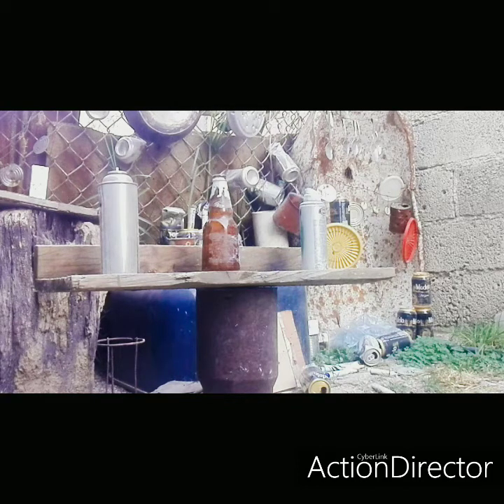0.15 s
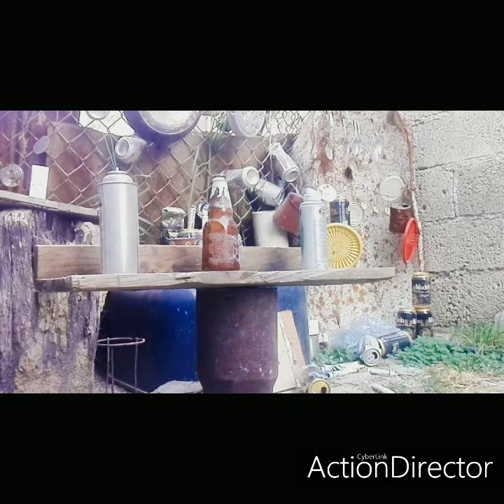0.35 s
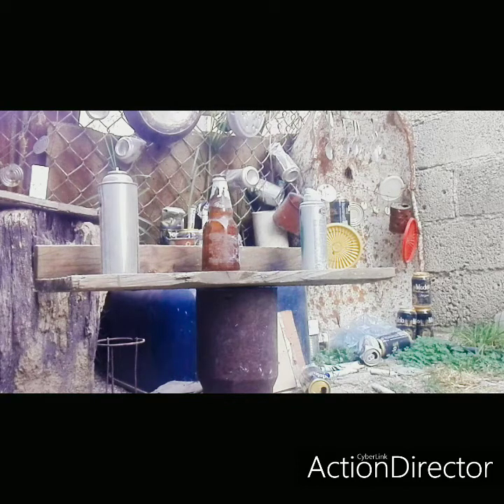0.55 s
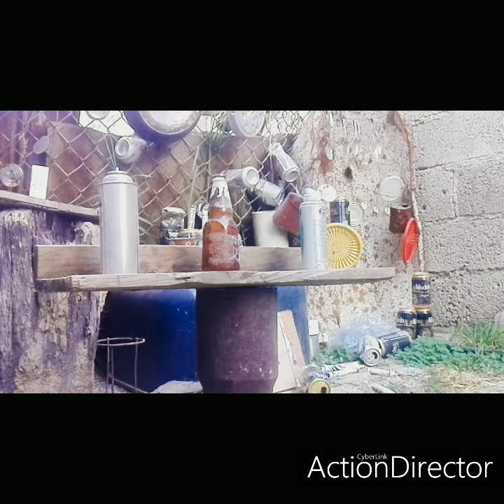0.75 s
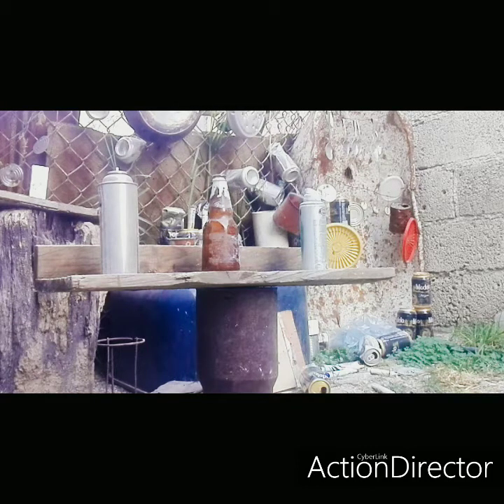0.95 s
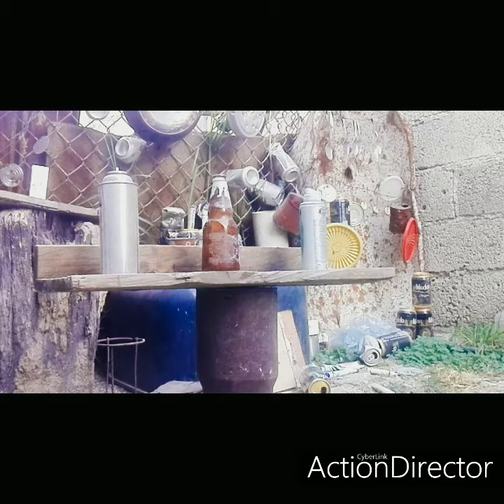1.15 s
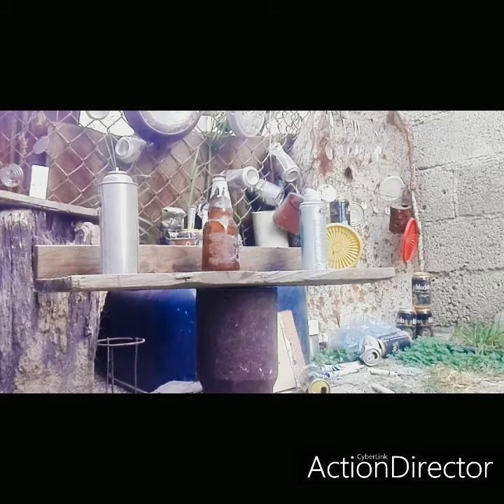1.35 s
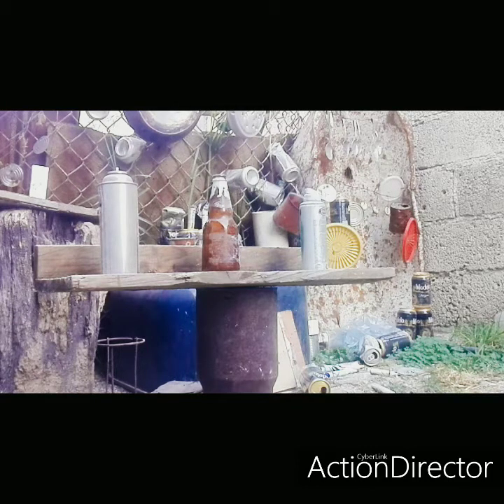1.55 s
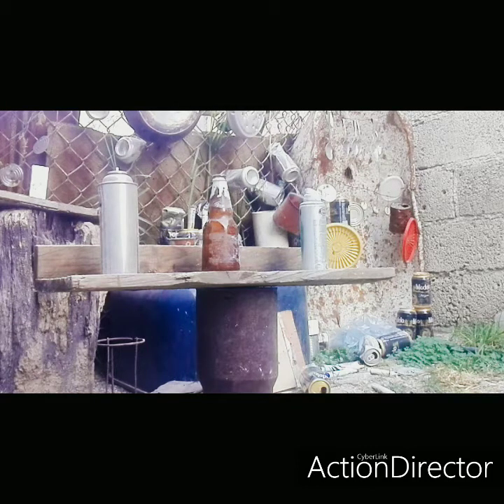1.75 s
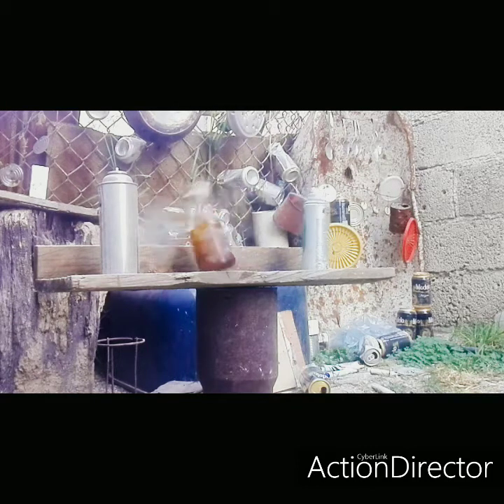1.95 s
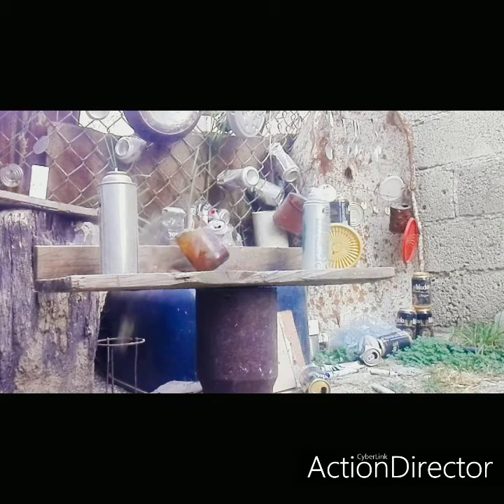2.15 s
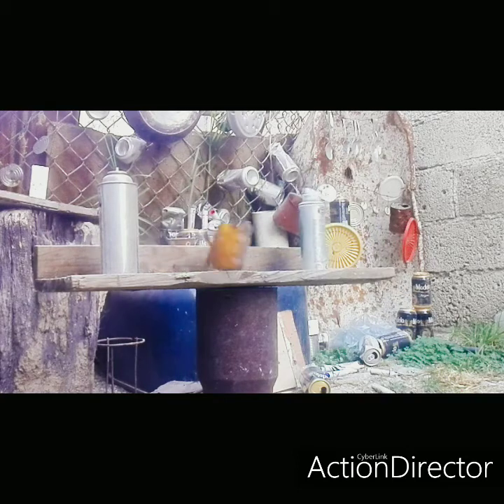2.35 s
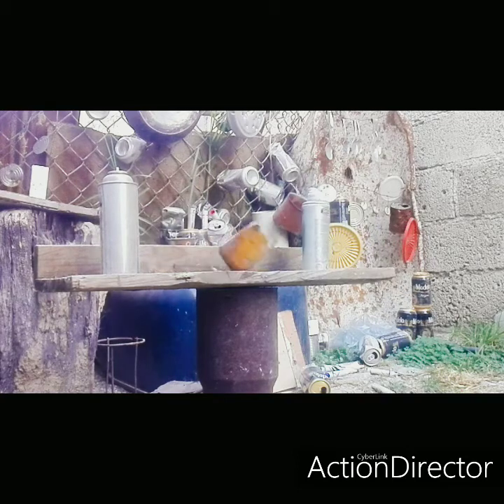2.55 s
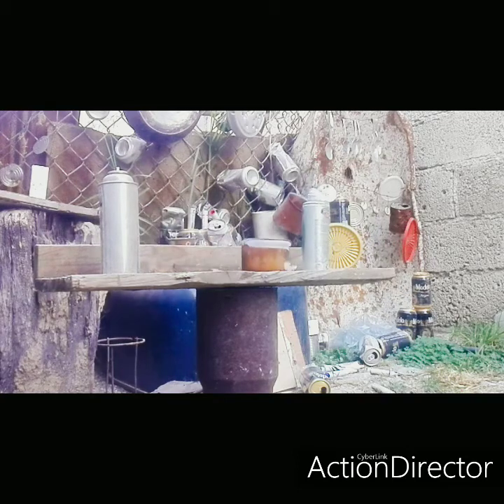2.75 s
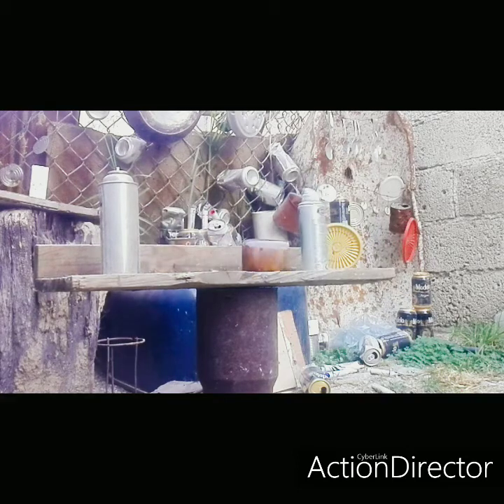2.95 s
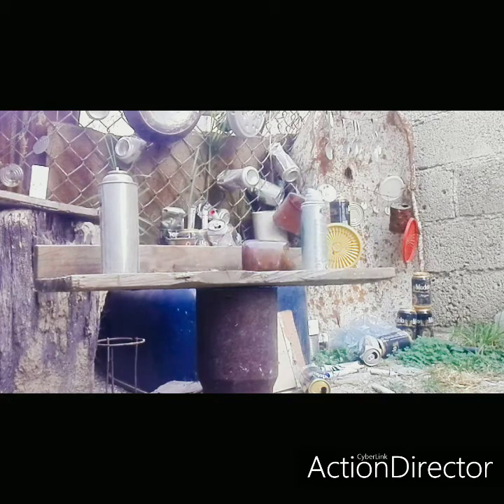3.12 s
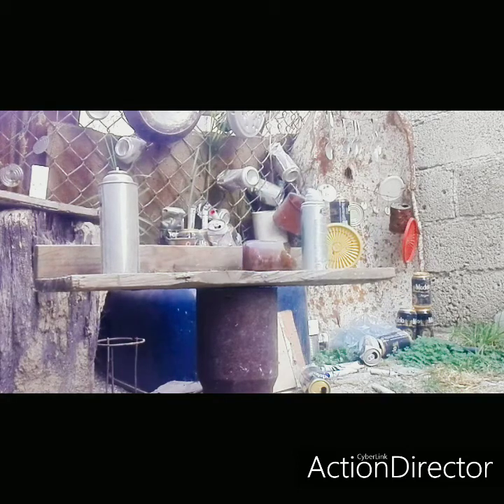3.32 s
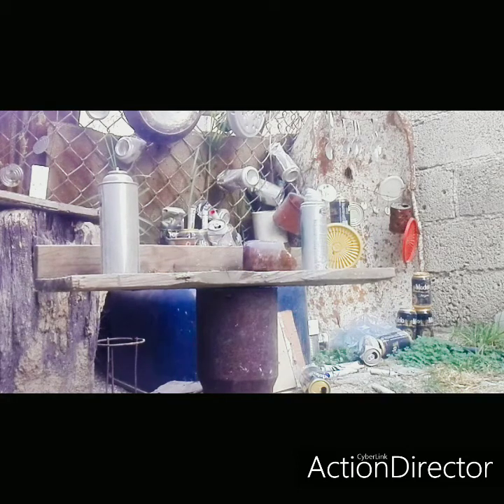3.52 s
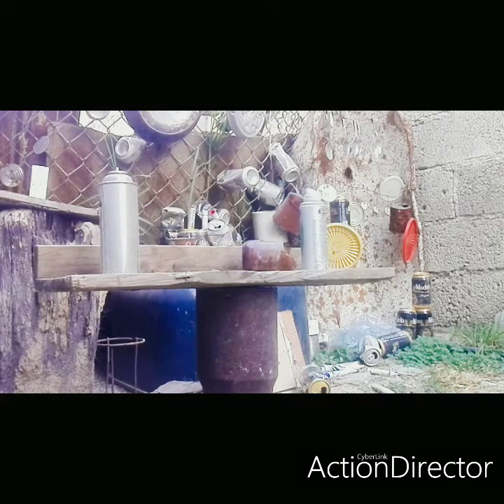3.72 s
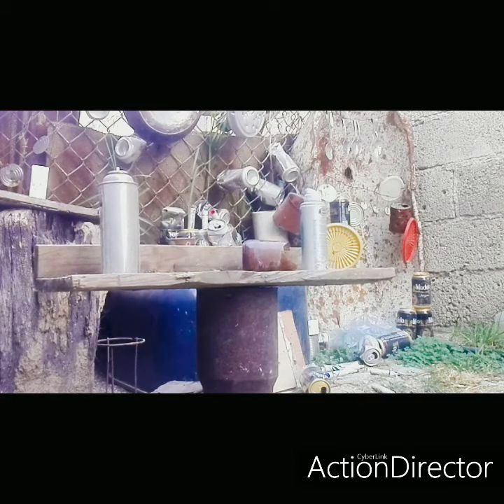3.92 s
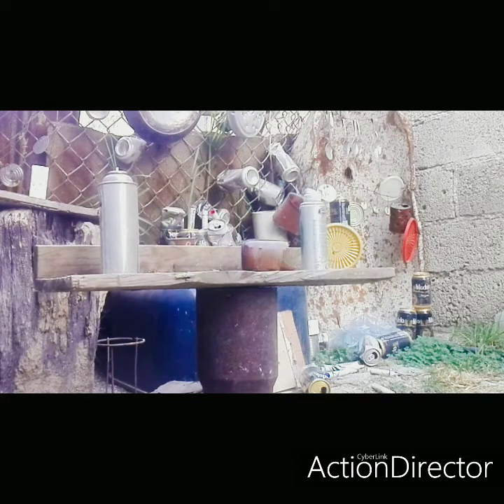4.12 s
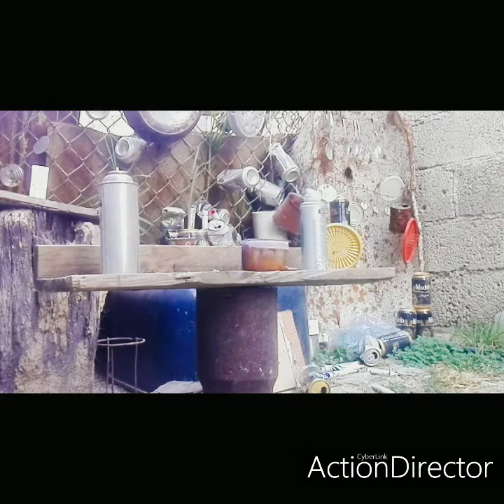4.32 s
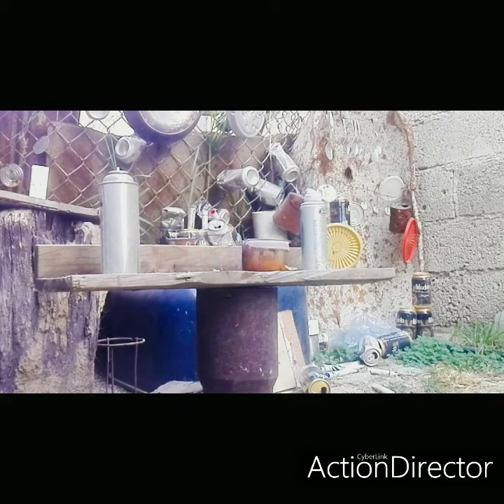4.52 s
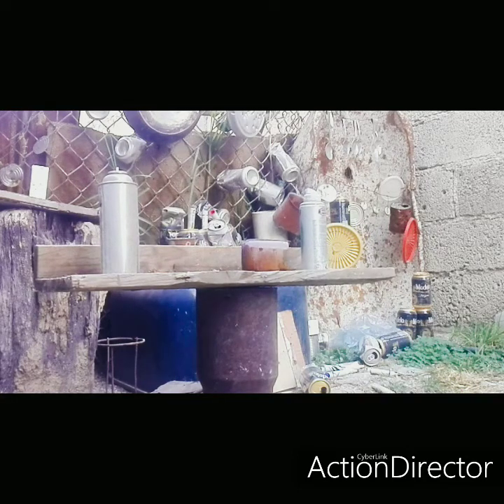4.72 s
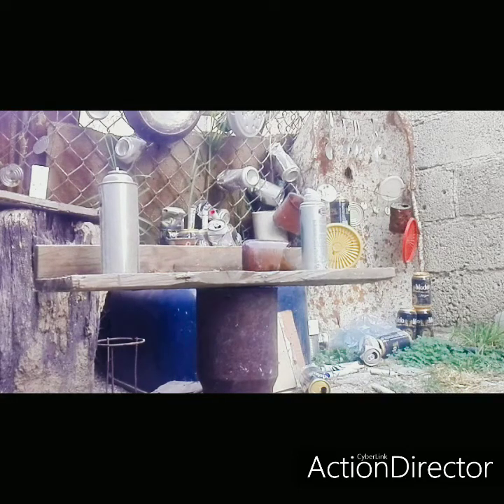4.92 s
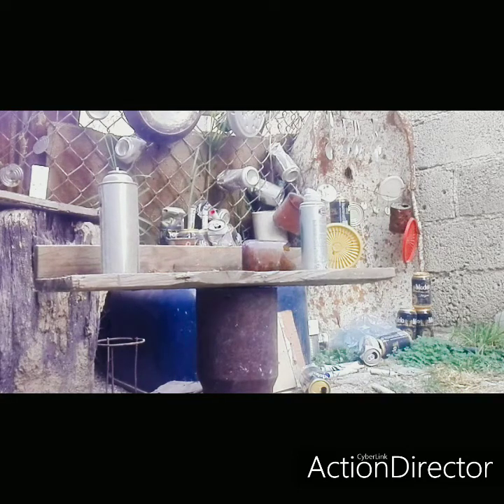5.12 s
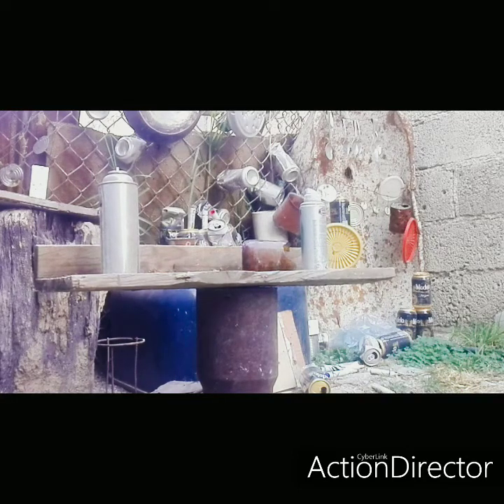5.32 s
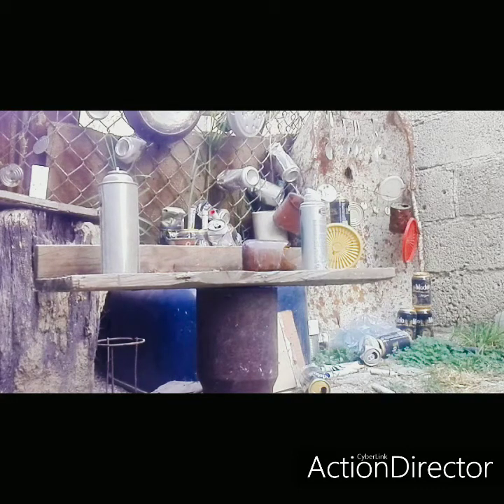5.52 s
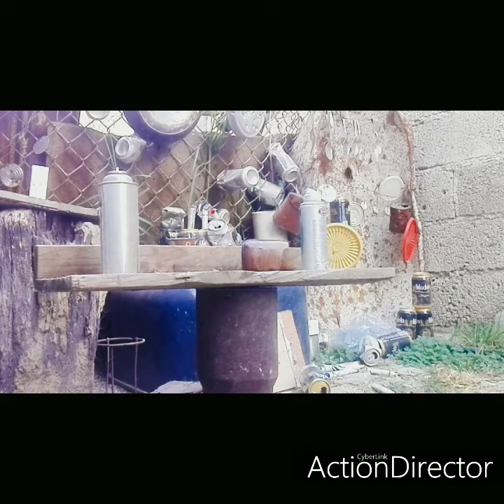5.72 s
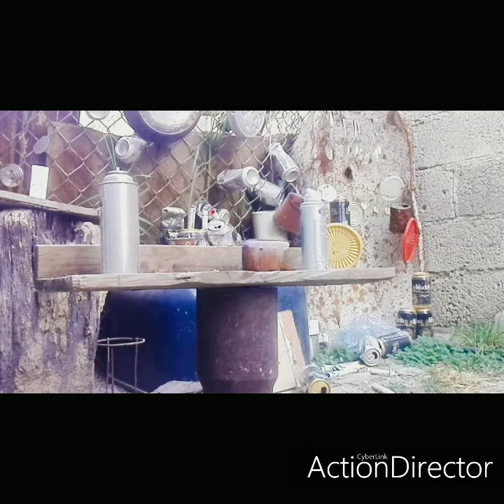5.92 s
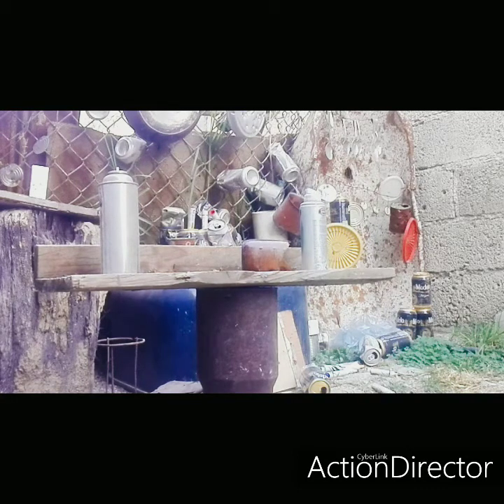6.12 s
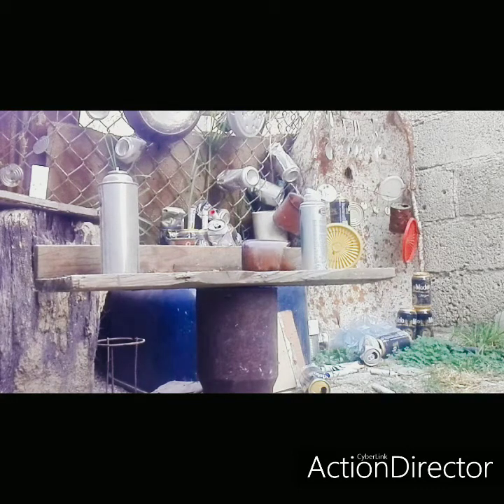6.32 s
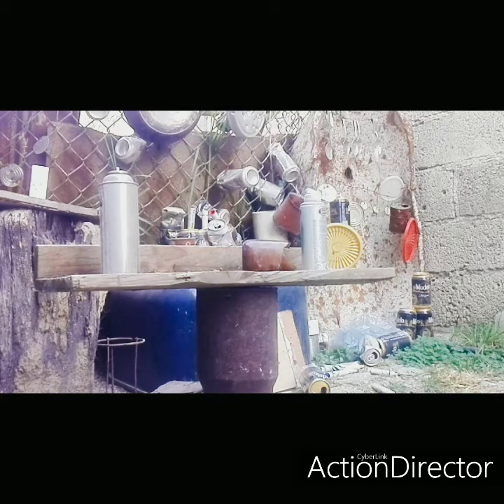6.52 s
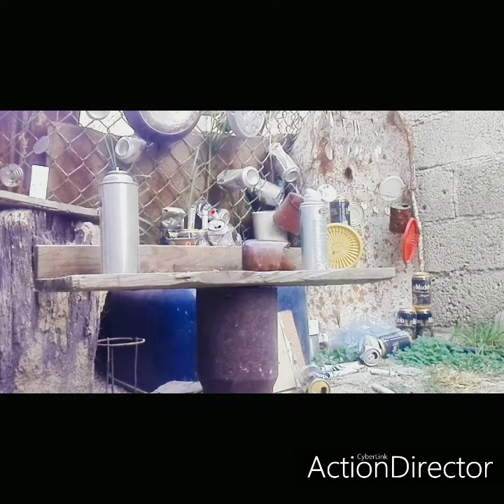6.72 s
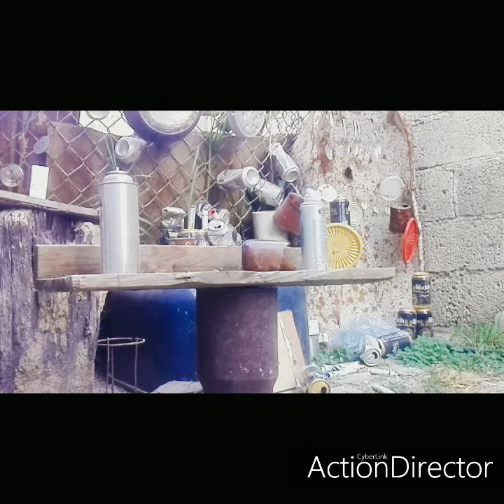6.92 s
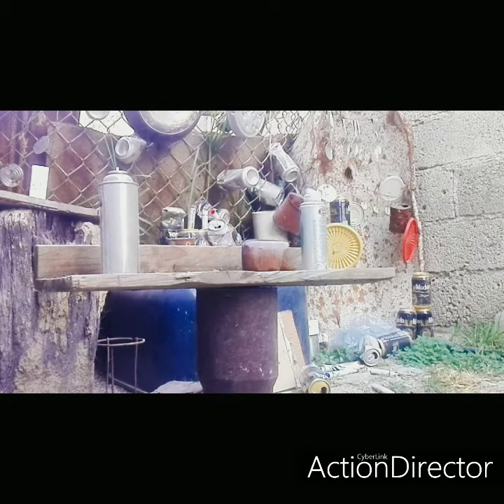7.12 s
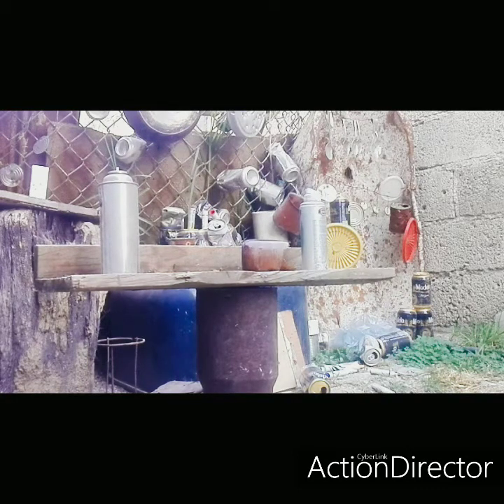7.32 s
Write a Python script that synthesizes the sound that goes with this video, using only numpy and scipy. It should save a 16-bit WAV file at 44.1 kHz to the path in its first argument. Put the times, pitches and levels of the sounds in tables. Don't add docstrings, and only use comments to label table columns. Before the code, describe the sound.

Quiet yard with low machinery drone; a sudden distorted glass smash at two seconds, tinkling splinters, a rocking stump, later a dull distant slam.

```python
import sys
import numpy as np
from scipy import signal
from scipy.fft import rfft, irfft
from scipy.io import wavfile
from scipy.ndimage import uniform_filter1d

SR = 44100
rng = np.random.default_rng(int(sys.argv[2]) if len(sys.argv) > 2 else 0)


def master_out(mix):
    frames = np.transpose(np.atleast_2d(mix))
    ceiling = np.clip(frames, -1, 1)
    pcm = np.round(ceiling * 32767).astype(np.int16)
    wavfile.write(sys.argv[1], SR, pcm)


def attenuation_scalar(level_db):
    decades = np.asarray(level_db, float) / 20
    return 10 ** decades


N = 324646
T = np.arange(N) / SR


def evened(x):
    return x / np.sqrt(np.mean(x ** 2) + 1e-20)


def coloured(x, points, lo_hz=20, hi_hz=20000):
    hz = np.fft.rfftfreq(N, 1 / SR) + 1
    f, db = np.transpose(points)
    gain = attenuation_scalar(np.interp(np.log(hz), np.log(f), db))
    edges = 1 / np.sqrt((1 + (lo_hz / hz) ** 4) * (1 + (hz / hi_hz) ** 4))
    return evened(irfft(rfft(x) * gain * edges, N))


def resonate(x, hz, width):
    turn = np.exp(2j * np.pi * np.cumsum(hz * np.ones(N)) / SR)
    r = np.exp(-np.pi * width / SR)
    return 2 * (turn * signal.lfilter([1 - r], [1, -r], x / turn)).real


def strike(s, db, t60, rise):
    t = np.maximum(T - s, 0)
    fall = attenuation_scalar(db - 60 * np.minimum(t / t60, 3))
    return fall * (1 - np.exp(-t / rise)) * (t < 3 * t60)


def hump(start, length, db, peak=.6, pointed=2):
    u = np.clip((T - start) / length, 0, 1)
    bend = np.log(.5) / np.log(np.clip(peak, .1, .9))
    return attenuation_scalar(db) * np.sin(np.pi * u ** bend).clip(0) ** pointed


def humps(rows, bed_db, peak=.6):
    return np.sqrt(attenuation_scalar(bed_db) ** 2 + sum(hump(*row, peak) ** 2 for row in rows))


def hiss():
    # (frequency [Hz], level [dB per Hz])
    air_colour = [(15, -63), (25, -35.5), (47, -30), (77, 0), (98, -0.5), (115, -8.5), (131, -19.5),
                  (223, -28), (525, -56), (1270, -48.5), (2340, -52), (13700, -55.5), (14800, -65.5)]
    # (time [s], level [dB])
    hiss_level = [(0, -76), (2.04, -80), (3.05, -82.5), (7.36, -82)]
    s, db = np.transpose(hiss_level)
    return attenuation_scalar(np.interp(T, s, db)) * coloured(rng.standard_normal(N), air_colour, lo_hz=597)


def wind():
    # (start [s], length [s], level [dB])
    gusts = [
        (.35, 0.7, -55),
        (1.6, .5, -58.5),
        (3.3, 0.92, -68),
        (4.95, .6, -64.5),
        (5.7, 0.25, -58),
        (6.3, 0.42, -56),
        (7.0, 0.19, -66.5),
    ]
    colour = [(8, -20), (20, -0.5), (50, -2.5), (120, -14), (300, -30.5), (900, -68)]  # (Hz, dB per Hz)
    return humps(gusts, -74.5, peak=0.55) * coloured(rng.standard_normal(N), colour)


def traffic():
    # (start [s], length [s], roar level [dB], swish relative to the roar [dB])
    passes = [(-.3, 1.06, -67.5, -11.5), (1.05, .34, -73, -17), (1.85, 0.47, -53.5, -20.5),
              (3.2, 1.2, -75.5, -9), (4.85, 1.07, -63.5, -10.5), (5.557, 0.266, -66.5, -26),
              (6.3, 0.55, -57.5, -8.5), (6.8, 0.38, -74, -9)]
    # (frequency [Hz], level [dB per Hz])
    roar_colour = [(110, -34.5), (190, -4.5), (216, 2.5), (254, -6), (355, -10), (800, -26), (1040, -57.5),
                   (1760, -120)]
    # (frequency [Hz], level [dB per Hz])
    swish_colour = [(410, -31.5), (700, -2), (749, -3.5), (1130, -1), (1230, -2), (1900, -5), (2130, -11),
                    (3500, -22), (4550, -48.5), (7700, -120)]
    roar = humps([row[:3] for row in passes], -80, peak=0.52)
    swish_rows = [(s, length, db + swish_db) for s, length, db, swish_db in passes]
    swish = humps(swish_rows, -87.5, peak=0.53)
    low = roar * coloured(rng.standard_normal(N), roar_colour)
    return low + swish * coloured(rng.standard_normal(N), swish_colour)


def groan():
    # (start [s], length [s], level [dB], pitch [Hz])
    metal = (.12, .23, -48, 237)
    turns = 2 * np.pi * metal[3] * T
    notes = np.sin(turns) + attenuation_scalar(-16) * np.sin(1.48 * turns) + attenuation_scalar(-25.5) * np.sin(2 * turns)
    return hump(*metal[:3], peak=0.68) * notes


def drone():
    # (start [s], length [s], level [dB], pitch [Hz])
    swells = [(-.1, .2, -47.5, 98), (.2, 0.59, -47, 99), (.55, .36, -53.5, 74.5), (.94, .1, -55, 97),
              (1.08, 0.38, -48, 86.5), (1.45, .42, -58, 74), (1.88, .2, -43, 98), (2.5, .17, -51, 100),
              (2.93, .14, -58, 77), (3.15, .12, -60, 92), (3.43, 0.31, -50, 87), (3.7, .42, -47.5, 76.5),
              (4.12, .12, -53.5, 95), (4.42, .2, -51, 96.5), (4.82, 0.36, -48.5, 98), (5.15, .1, -54, 106),
              (5.26, .12, -51, 94), (5.41, .13, -46.5, 97.5), (5.57, .17, -47.5, 97.5),
              (5.79, 0.523, -46.5, 85), (6.38, .25, -45.5, 92), (7.15, 0.14, -61, 88)]
    # (start [s], length [s], level [dB])
    rumbles = [(-.3, 0.58, -57.5), (.4, 0.42, -59), (1.0, 0.92, -65), (1.84, .25, -46), (3.1, 0.28, -61.5),
               (5.0, .8, -63.5)]
    idle_hz, idle_db = 87, -63
    rows = swells + [(-10.5, 25, idle_db, idle_hz)]
    power = np.array([hump(s, length, db, .57, pointed=1.2) ** 2 for s, length, db, _ in rows])
    pitches = np.array(rows)[:, 3]
    hz = pitches @ power ** 2 / (power ** 2).sum(0)
    level = np.sqrt(power.sum(0))

    fuzz = evened(resonate(resonate(rng.standard_normal(N), hz, 12), hz, 31))
    steady = .65 * (1 - power[-1] / level ** 2)
    tone = np.sqrt(2) * np.sin(2 * np.pi * np.cumsum(hz) / SR)
    hum = steady * tone + np.sqrt(1 - steady ** 2) * fuzz

    rumble = evened(resonate(resonate(rng.standard_normal(N), 165, 22), 150, 21))
    rumble_level = np.hypot(humps(rumbles, -71.5), attenuation_scalar(-22) * level)
    return level * hum + rumble_level * rumble


def door():
    # (time [s], level [dB], time to fall 60 dB [s], sharpness [dB])
    slams = [
        (1.892, -50, .6, -16),
        (6.352, -35, 0.21, 5),
        (6.39, -43.5, 0.57, 0),
        (6.46, -44, 0.25, 8),
        (6.559, -49, 0.086, 13),
        (6.614, -53, .2, 11),
    ]
    # (frequency [Hz], level [dB per Hz])
    door_colour = [(35, -33), (86, 1), (124, -7), (168, -2.5), (407, -24), (1000, -24), (2800, -39),
                   (4600, -72)]
    body = np.sqrt(sum(strike(s, db, t60, 0.002) ** 2 for s, db, t60, _ in slams))
    edge = np.sqrt(sum(strike(s, db + sharp_db - 20, .8 * t60, 0.0014) ** 2
                       for s, db, t60, sharp_db in slams))
    noise = rng.standard_normal(N)
    return body * coloured(noise, door_colour, hi_hz=500) + edge * coloured(noise, door_colour, lo_hz=700)


def plank():
    # (time [s], level [dB], time to fall 60 dB [s])
    rocks = [
        (2.833, -44, .3),
        (2.878, -41, .3),
        (2.945, -53, .3),
        (3.02, -65, .3),
        (3.06, -65, .3),
        (3.18, -77, .8),
    ]
    # (frequency [Hz], level [dB per Hz])
    wood_colour = [(250, -25), (400, -3), (900, 0), (1200, -6), (1800, -22), (3000, -45)]
    grains = rng.standard_normal(N) * (rng.random(N) < .03)
    level = np.sqrt(sum(strike(s, db, t60, .002) ** 2 for s, db, t60 in rocks))
    return level * coloured(grains, wood_colour)


def pure_notes(rows):
    return sum(strike(s, db, t60, 0.0021) * np.sin(2 * np.pi * hz * (T - s)) for s, db, hz, t60 in rows)


def flakes():
    # (time [s], level [dB], pitch [Hz], time to fall 60 dB [s])
    flake_notes = [
        (2.193, -30, 6200, 0.06),
        (2.27, -46.5, 12400, 0.11),
        (2.535, -42, 9700, 0.039),
        (6.614, -45, 1300, 0.043),
        (6.65, -56.5, 990, .05),
    ]
    return pure_notes(flake_notes)


def thumps():
    # (time [s], level [dB], pitch [Hz], time to fall 60 dB [s])
    blows = [
        (2.042, -1, 142, 0.062),
        (2.044, -6, 48, 0.07),
        (2.045, -8, 72, 0.091),
        (2.044, -7, 580, 0.079),
        (2.046, -16, 310, .07),
        (2.404, -36, 389, 0.048),
        (2.556, -42, 149, 0.13),
        (6.355, -20.5, 158.5, 0.075),
        (6.354, -29.5, 236, .07),
        (6.353, -45, 39.6, 0.093),
    ]
    return pure_notes(blows)


def ring(modes, rattle, split=0.015, flutter=.3):
    t = T[:SR // 2]
    contacts = rng.standard_normal(4000) * np.exp(-t[:4000] / rattle) * (rng.random(4000) < .03)
    contacts[0] = 1
    out = 0
    for hz, db, t60 in modes:
        decay_s = min(t60, .5)
        twin_hz = hz * (1 + split * rng.uniform(-1, 1))
        twin = .5 * np.sin(2 * np.pi * twin_hz * t) * attenuation_scalar(-40 * t / decay_s)
        tumble = 1 + flutter * evened(uniform_filter1d(rng.standard_normal(len(t)), size=500))
        fall = attenuation_scalar(-60 * t / decay_s) * (1 - np.exp(-t / .002))
        tone = fall * (np.sin(2 * np.pi * hz * t) + twin) * tumble
        driven = signal.fftconvolve(tone, contacts)
        out = out + attenuation_scalar(db) * driven * np.linalg.norm(tone) / np.linalg.norm(driven)
    return out


def shards():
    # (time [s], level [dB], length of the rattle [s])
    clinks = [
        (2.4134, -15, 0.003),
        (2.501, -19, 0.012),
        (2.578, -33.5, 0.004),
        (2.832, -35, 0.005),
        (2.878, -34, 0.01),
        (3.021, -72, 0.0031),
    ]
    # (pitch [Hz], level [dB], time to fall 60 dB [s])
    shard_a = [(1050, -34, 0.4), (1270, -25, .2), (2580, -12, 0.12), (3368, 2, 0.05), (3150, -13, .14),
               (3760, -11, 0.1), (4500, -15, 0.1), (5380, -9, 0.08), (6010, -13, 0.087), (7250, -21, 0.15),
               (7600, -22, 0.1), (12195, -17, 0.04), (13580, -16, 0.074)]
    shard_b = [(2721, -20.5, 0.25), (3165, -7, 0.16), (3686, -1, 0.13), (4750, 1.5, 0.027),
               (6000, -16, 0.081), (6660, -14.5, 0.077), (8000, -17.5, 0.084), (11020, -24, 0.043),
               (13750, -18, 0.073)]
    shard_c = [(1042, -8, 0.3), (1790, -5, 0.17), (2010, -4, 0.17), (2200, -8, .1), (2384, -7, 0.12),
               (3671, -11, 0.11), (12330, -9, .12), (12360, -11, 0.4)]
    stump = [(357.2, -6, 0.28), (458, -9, .15), (584, -5, 0.3), (708, -7, .15), (858, -3, 0.16),
             (1090, -3, 0.14), (1300, -9, .1), (1640, -15, .45), (1930, -16, 0.38), (2150, -4, .06),
             (3200, -9, .05), (3750, -13, .05), (6160, -10, 0.08), (7000, -10, 0.07)]
    shard_d = [(6160, -9, 0.11), (7983, -16, 0.18), (10030, 1, 0.12), (11900, -4.5, 0.16),
               (14020, -6, 0.18)]
    out = np.zeros(N + SR)
    for (s, db, rattle), modes in zip(clinks, (shard_a, shard_b, shard_c, stump, stump, shard_d)):
        sound = attenuation_scalar(db) * ring(modes, rattle)
        at = round(s * SR)
        out[at:at + len(sound)] += sound
    return out[:N]


def walls(x, t60=0.15):
    t = T[:SR // 3]
    taps = rng.choice([-1, 1], len(t)) * (rng.random(len(t)) < .04) * (t > .004) * attenuation_scalar(-60 * t / t60)
    return signal.oaconvolve(x, taps / np.linalg.norm(taps))[:N]


def tinkle(per_s=2500, spread_db=3.8, cycles=14):
    out, t = np.zeros(N), T[:1500]
    for hz in np.geomspace(900, 14000, num=36):
        strength = attenuation_scalar(spread_db * np.minimum(rng.exponential(1, N), 4))
        hits = strength * (rng.random(N) < per_s / 36 / SR)
        note = np.sqrt(hz) * np.exp(-t * hz / cycles) * np.sin(2 * np.pi * hz * t)
        out += signal.oaconvolve(hits, note)[:N]
    return evened(out)


def rain(db, fade_db_per_s):
    start_s, end_s, hold_s = 2.022, 2.98, 0.36
    t = T - start_s
    edges = np.clip(t / .06, 0, 1) * np.clip((end_s - T) / .034, 0, 1)
    return edges * attenuation_scalar(db + fade_db_per_s * np.maximum(t - hold_s, 0))


def splinters(per_s=5000, spread_db=0.5, width_hz=1400):
    # (time [s], coarse level [dB], fine relative to coarse [dB], time to fall 60 dB [s],
    # centre of the coarse grit [Hz])
    bursts = [(2.0429, 7, -9, 0.094, 1900), (2.059, -6.5, -1, 0.22, 3100), (2.085, -19.5, -18, .041, 2000),
              (2.13, -23, -10, .3, 1700), (2.202, -30, -6.5, .08, 3500), (2.264, -27, -14, 0.1, 2950),
              (2.328, -25, -11, .13, 2040), (2.379, -43, 5, 0.06, 1610), (2.406, -3, 0, 0.0053, 2500),
              (2.4135, -28, -5, 0.13, 3370), (2.465, -38, -8.5, 0.062, 1190), (2.501, -38, 3, 0.19, 3560),
              (2.577, -39, -8, .12, 1990), (2.632, -41, 1.5, 0.051, 4000), (2.73, -54.5, -4, 0.2, 2980),
              (2.8313, -33, 6, 0.12, 2100), (2.876, -42, -16, .2, 1200), (2.89, -40.5, -1, 0.12, 1000),
              (2.935, -54, -2, .12, 3500), (3.381, -77, 8, .059, 2995)]
    # (frequency [Hz], level [dB per Hz])
    grit_colour = [(88, -42), (150, -10.5), (385, -14), (513, -10.5), (768, -12), (931, -10), (1450, -3.5),
                   (1590, -3.5), (1720, -6.5), (3640, -10.5), (6730, -15.5), (13700, -21.5), (14800, -32.5)]
    cracks = attenuation_scalar(spread_db * np.minimum(rng.exponential(1, N), 5)) * (rng.random(N) < per_s / SR)
    cracks = evened(cracks * rng.choice([-1, 1], N))
    cracks = cracks + 0.84 * rng.standard_normal(N) + 0.61 * tinkle()

    coarse = coloured(cracks, grit_colour, hi_hz=4550)
    fine = coloured(cracks, grit_colour, lo_hz=4760)
    starts, centres = np.array(bursts)[:, [0, -1]].T
    centre_hz = centres[np.maximum(np.searchsorted(starts, T) - 1, 0)]
    coarse = evened(.6 * coarse + evened(resonate(cracks, centre_hz, width_hz)))

    coarse_gain = rain(-35, fade_db_per_s=-75.5)
    fine_gain = rain(-50, fade_db_per_s=-49.5)
    for s, coarse_db, fine_db, t60, _ in bursts:
        rise = .008 * t60 if t60 > .1 or coarse_db < -12 else .0003
        coarse_gain = np.hypot(coarse_gain, strike(s, coarse_db, t60, rise))
        fine_gain = np.hypot(fine_gain, strike(s, coarse_db + fine_db, 0.48 * t60, rise))
    return coarse * coarse_gain + fine * fine_gain


def scene():
    far = hiss() + wind() + traffic() + groan() + drone() + door()
    pieces = flakes() + thumps() + shards()
    return (far + plank() + pieces + attenuation_scalar(-8) * walls(pieces) + splinters())[None]


def top_cut(x):
    return signal.sosfilt(signal.butter(12, 15030, fs=SR, output="sos"), x)


def record(dry):
    band = signal.oaconvolve(dry, signal.firwin(255, 14450, fs=SR)[None], "same")
    return top_cut(np.clip(band, -.98, .98))


dry = scene()
out = record(dry)
master_out(out)
```